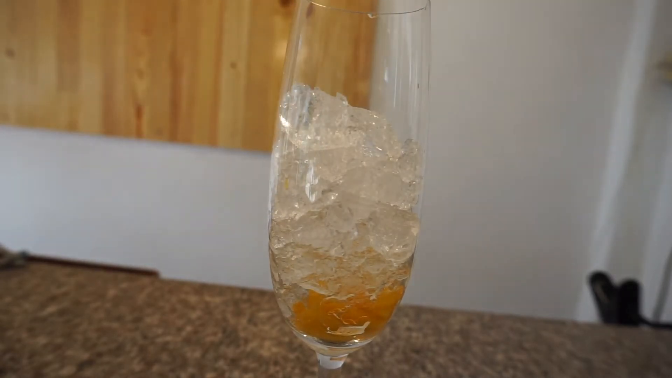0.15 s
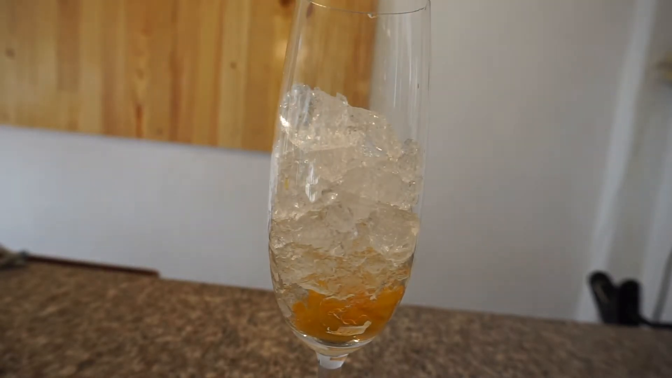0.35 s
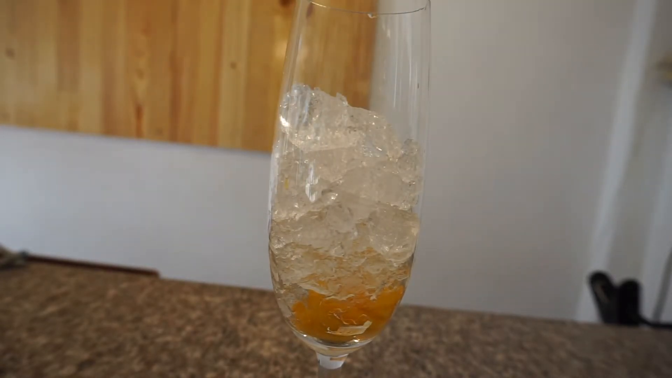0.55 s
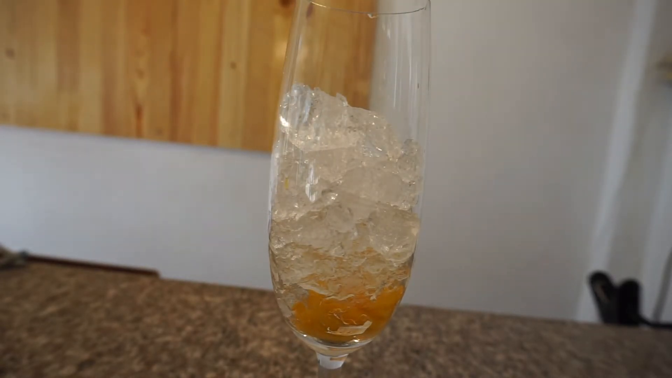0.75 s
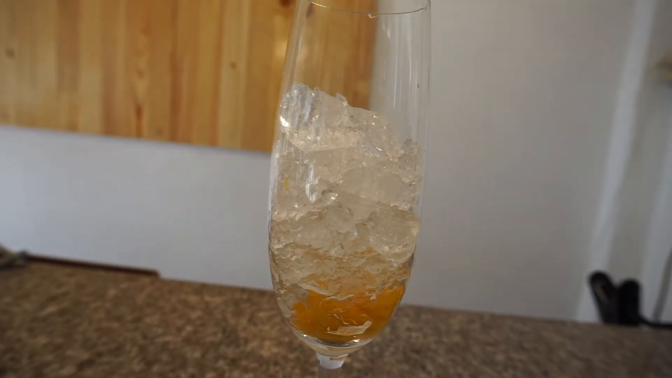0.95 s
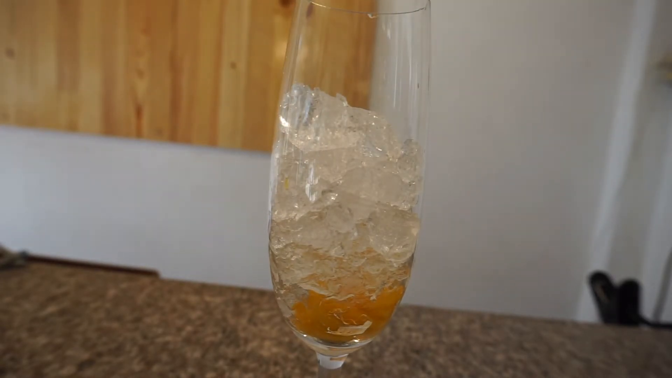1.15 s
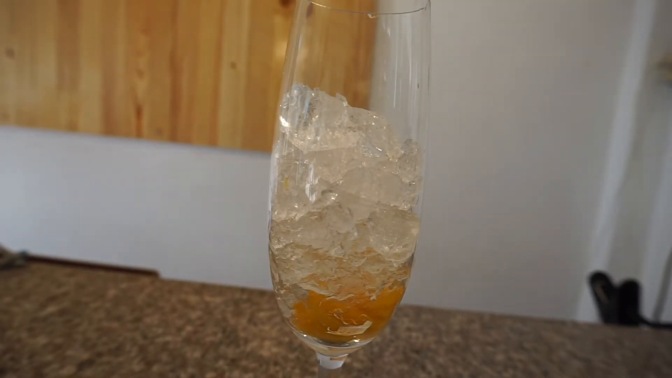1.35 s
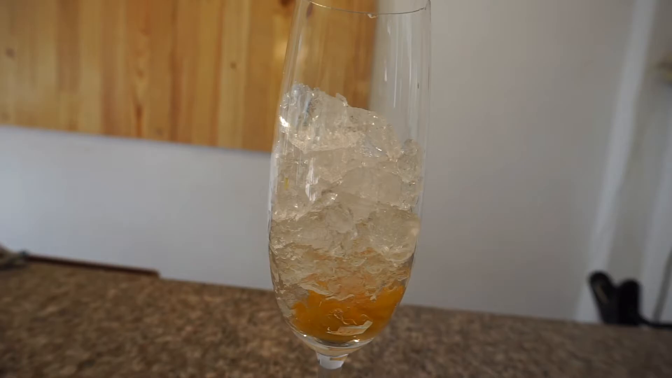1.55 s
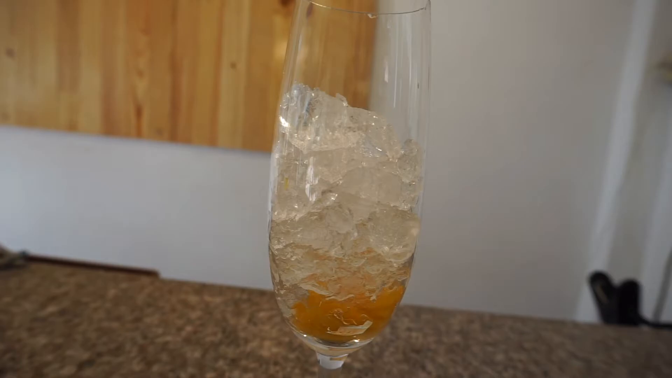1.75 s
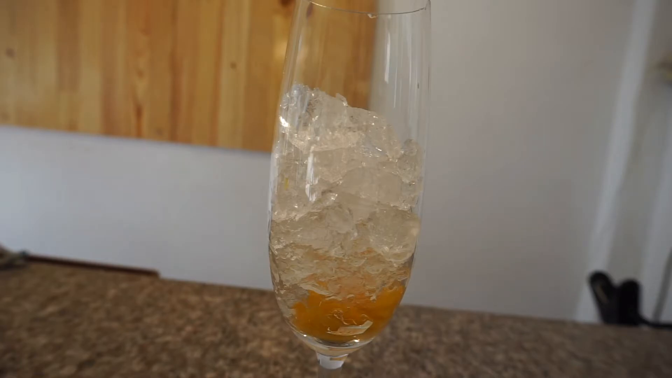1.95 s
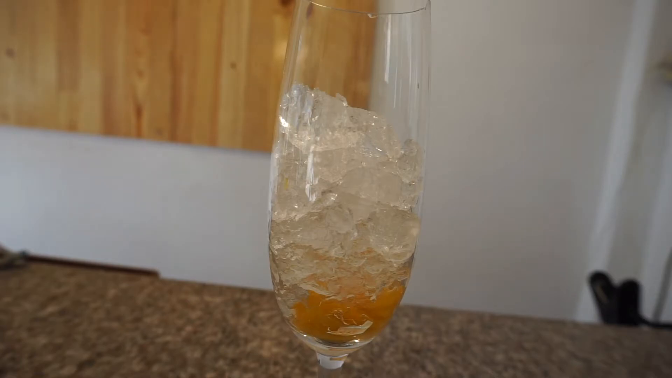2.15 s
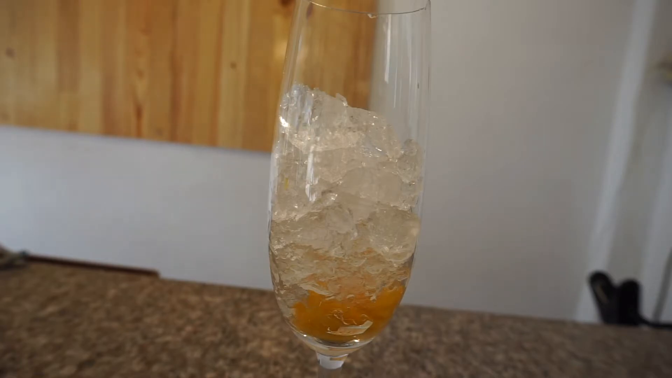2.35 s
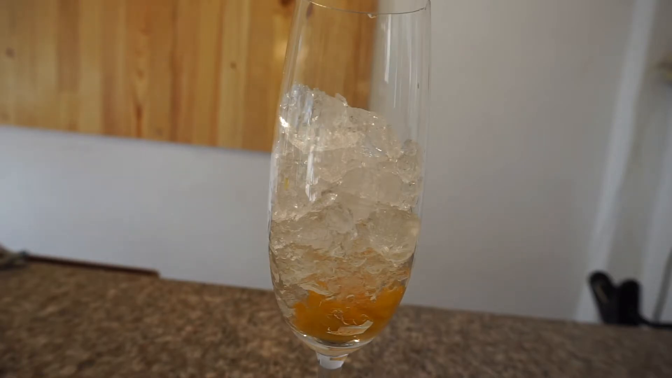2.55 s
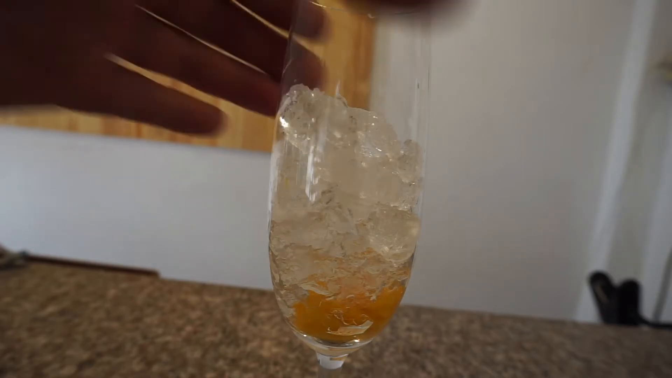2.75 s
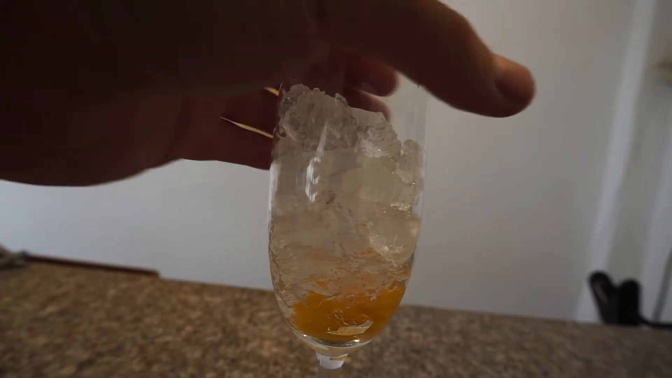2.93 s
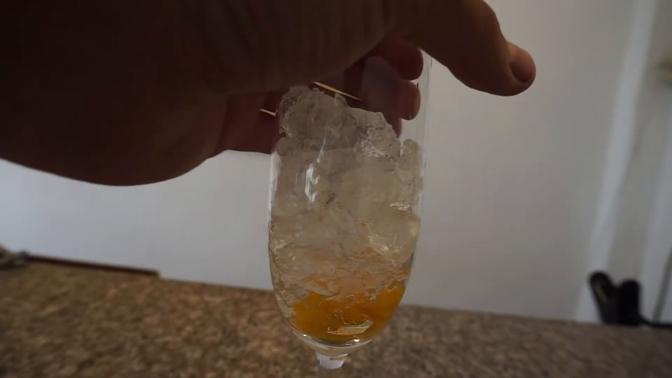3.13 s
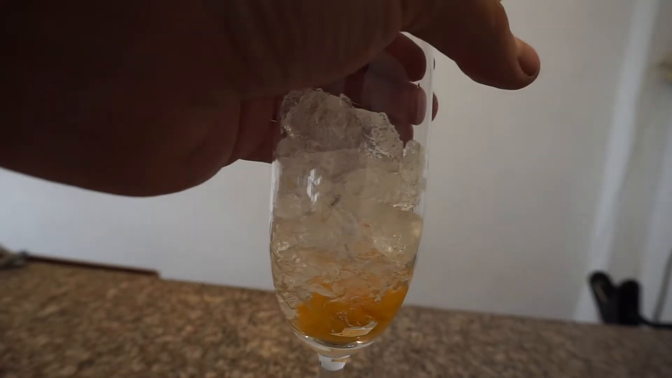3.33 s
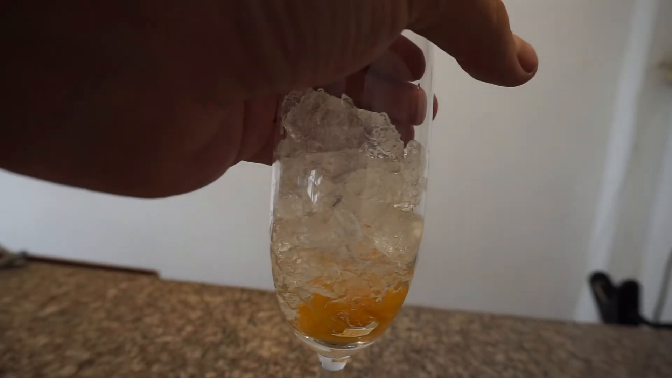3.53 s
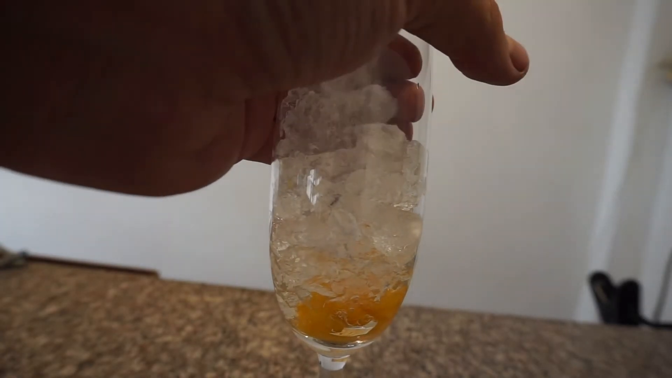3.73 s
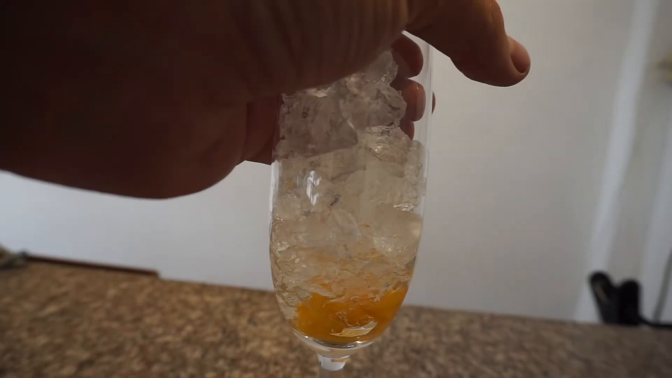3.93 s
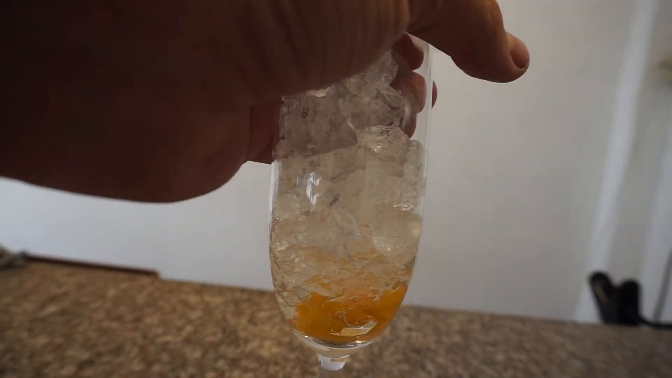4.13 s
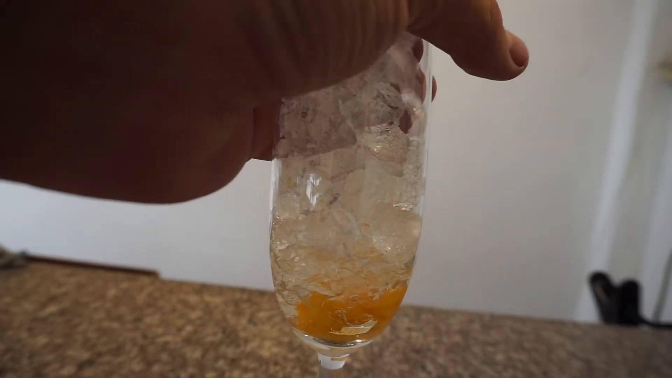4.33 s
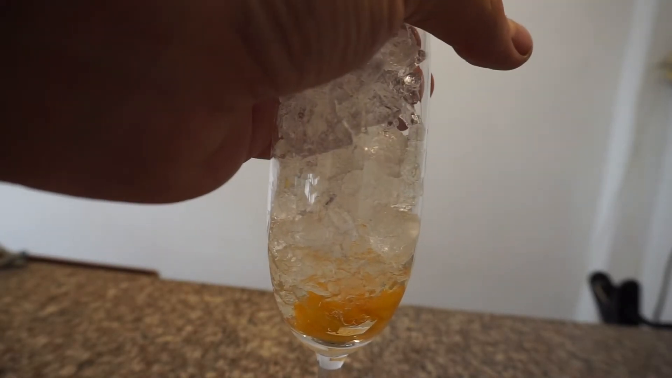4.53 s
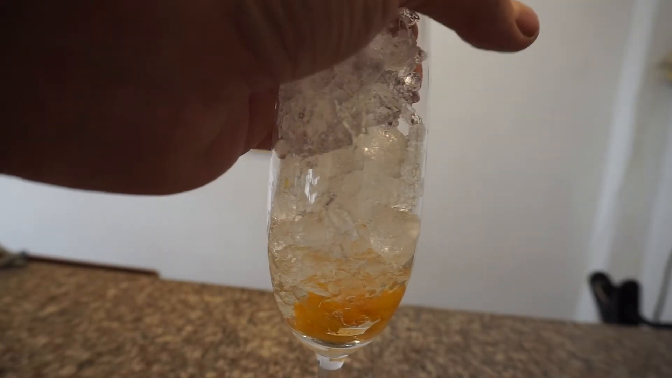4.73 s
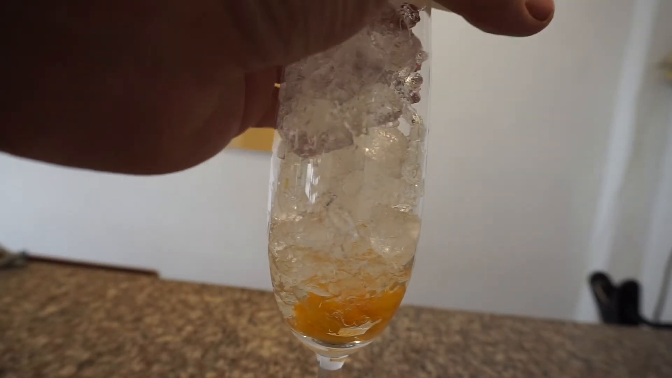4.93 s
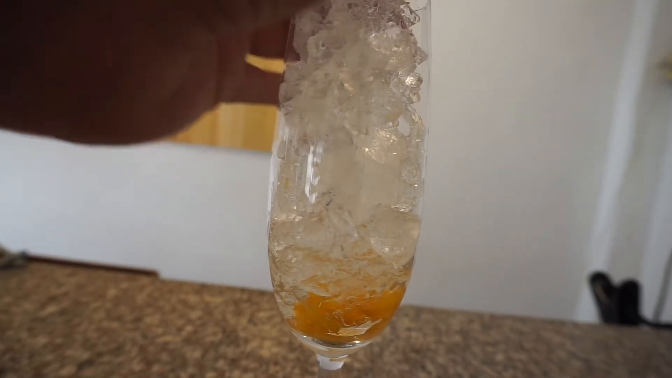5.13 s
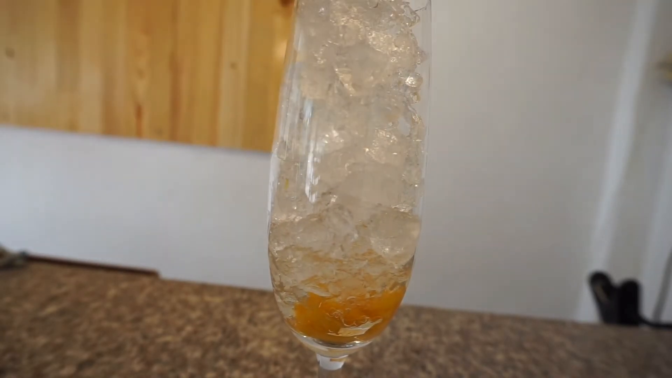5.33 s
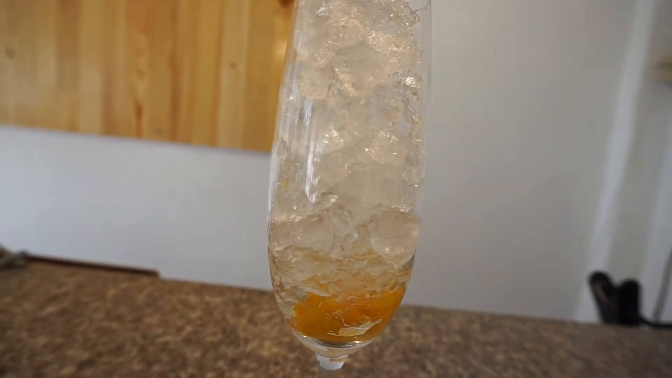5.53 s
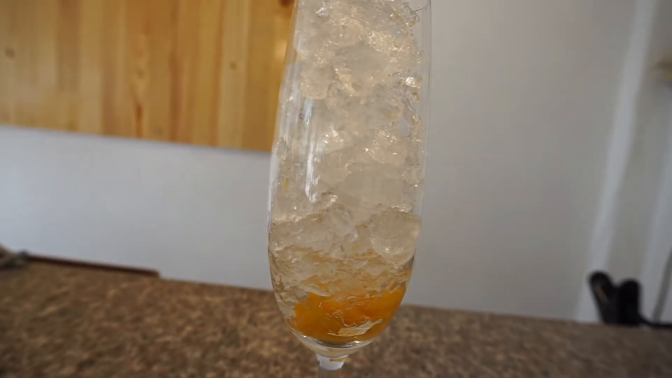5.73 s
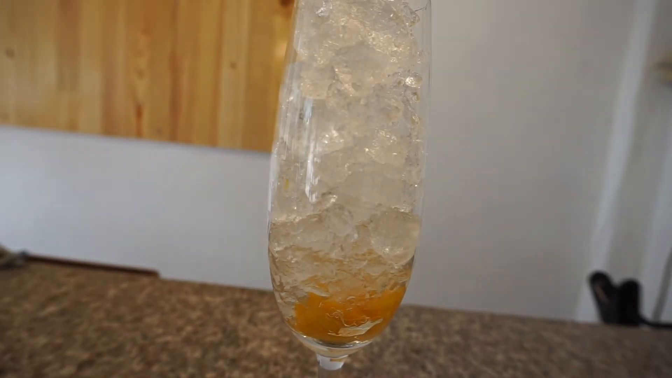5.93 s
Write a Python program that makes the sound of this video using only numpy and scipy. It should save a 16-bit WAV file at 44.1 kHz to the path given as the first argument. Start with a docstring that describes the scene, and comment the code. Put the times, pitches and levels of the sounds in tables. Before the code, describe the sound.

Crushed ice is scooped from a tub at the back of a kitchen, a dense, echoing rattle in several strokes. After a pause, close to the microphone, a palm thuds softly on the mouth of a tall glass and presses the ice in. Lumps knock and clink amid fine crunching, one shard pings, and a last lump clinks. A faint appliance hum runs underneath.

```python
"""Crushed ice pressed by hand into a tall glass, close by. Lumps knock on the ice-damped wall and ring
the air above the ice, amid fine crunching and soft palm thuds. One shard pings; a last lump clinks.
Before that, the ice is scooped from a tub at the back of the kitchen: a dense, reverberant rattle
of tiny contacts. An appliance hums throughout over soft air noise."""
import sys
import numpy as np
from scipy import signal
from scipy.fft import rfft, irfft, next_fast_len
from scipy.io import wavfile
from scipy.ndimage import uniform_filter1d

SR = 44100
rng = np.random.default_rng(int(sys.argv[2]) if len(sys.argv) > 2 else 0)


def wrap_up_sound(samples):
    """Save the sound to the file named by the first command line argument, as 16-bit audio."""
    columns = np.atleast_2d(samples).T
    # keep every value between -1 and 1, then stretch to whole-number steps
    tamed = np.clip(columns, -1, 1)
    steps = np.round(tamed * 32767).astype(np.int16)
    wavfile.write(sys.argv[1], SR, steps)


N = 263698
TIME_S = np.arange(N) / SR
CUTOFF_HZ = 11200

# Appliance hum. Each row: frequency in Hz, level in dB, width in Hz.
HUM_LINES = [(149.6, -71.5, 15), (188.8, -62.5, 16), (286.7, -73, 9.2), (331.6, -72, 12), (562, -72.5, 9.2),
             (623.4, -61.5, 11)]
# Air noise. Each row: frequency in Hz, spectral level in dB.
AIR_SPECTRUM = [(25, -11), (90, -16), (140, -8), (200, 4), (350, -1.5), (550, 7), (780, 4.5), (1050, -0.5),
                (1600, -7), (2300, -8.5), (3300, -15.5), (6000, -18), (11000, -18.5)]
# Drift of hum and air noise. Each row: time in seconds, gain in dB.
BACKGROUND_DRIFT = [(0, 0.5), (3.3, 2), (4.4, -2), (5.98, -0.1)]
# Kitchen decay. Each row: frequency in Hz, T60 in seconds.
ROOM_DECAY = [(200, 0.54), (800, 0.56), (2300, 0.98), (5000, 0.62), (10000, 0.45)]
# Diffuse field. Each row: frequency in Hz, left-right coherence from 0 to 1.
COHERENCE = [(30, .15), (70, .4), (150, .93), (650, 0.74), (1400, 0.37), (2600, 0.06), (5000, 0.027),
             (11000, .1)]
# Echoes off counter and walls. Each row: delay in seconds, gain in dB.
EARLY_ECHOES = [(.0013, -31.5), (.0057, -15), (0.0101, -15.5), (0.0189, -24)]
# Microphone phase. Each row: frequency in Hz, left minus right in radians.
MIC_PHASE = [(30, 0), (200, -0.35), (700, -0.79), (1500, -0.7), (2700, -0.48), (5000, -0.79), (9000, -1.4)]
# Microphone balance. Each row: frequency in Hz, left minus right in dB.
MIC_BALANCE = [(500, 0.5), (2200, 2.5), (4500, 2), (8000, 1), (11000, 0)]

# Contacts in the tub. Each row: frequency in Hz, spectral level in dB.
TUB_SPECTRUM = [(150, -30), (250, -20.5), (370, -25), (480, -11.5), (590, -5), (760, -8.5), (1080, -8.5),
                (1450, -4.5), (1800, -1.5), (2150, -2.5), (3200, -1.5), (4500, -11.5), (6500, -13.5),
                (11000, -14.5)]
# Tub resonances. Each row: frequency in Hz, gain in dB, T60 in seconds.
TUB_MODES = [(545, -7.5, .07), (599, 5.5, 0.11), (1482, 1, 0.0085), (2170, 3, 0.0061), (3230, -3.5, 0.0038)]
# Hand strokes in the tub. Each row: start in seconds, level in dB, swell and fade in seconds.
STROKES = [(.18, -24, 0.04, 0.12), (.36, -25.5, 0.059, 0.029), (.59, -21, 0.067, 0.12),
           (.8, -32, 0.029, 0.2), (1.1, -40, 0.11, 0.16), (1.3, -37, 0.038, 0.1), (1.44, -35, 0.053, 0.023)]
# Clumps break loose and bump the tub. Each row: start in seconds, crack in dB, bump in dB.
LOOSE_CLUMPS = [(0.188, -35, -44.5), (.271, -38, -21.5), (0.413, -35, -24.5), (0.655, -19.5, -27),
                (0.792, -25, -33), (0.937, -32, -23), (1.08, -35, -49), (1.249, -25, -33),
                (1.461, -35, -27), (1.486, -31.5, -37), (1.52, -27.5, -30)]
# Big lumps go first, chips remain. Each row: time in seconds, splinters over lumps in dB.
SPLINTER_MIX = [(.85, -4.5), (1.5, 0.5)]

# Palm sliding over the glass mouth. Each row: time in seconds, level in dB.
PALM_SLIDE = [(2.35, -67.5), (2.8, -70.5), (3.1, -58), (3.25, -62.5), (3.37, -46.5)]
# Palm closing on the glass mouth. Each row: time in seconds, level in dB.
PALM_THUDS = [(3.2545, -37), (3.2833, -30.5), (3.3774, -25.5), (3.3925, -29), (4.5645, -33)]
# Contacts in the palm. Each row: frequency in Hz, spectral level in dB.
PALM_SPECTRUM = [(200, -15.5), (480, -32.5), (690, 7), (900, -8.5), (1250, -4), (1850, 9.5), (2450, 11),
                 (3400, 0.5), (5000, -13), (8300, -6.5), (11000, -13)]
# Squeezes, weaker as the hand empties. Each row: start in seconds, level in dB, fade in seconds.
PALM_SQUEEZES = [(3.387, -30.5, 0.078), (3.53, -37, 0.25), (3.885, -35, 0.027), (4.045, -34, 0.066),
                 (4.17, -39.5, 0.075), (4.33, -43, 0.19), (4.664, -46.5, 0.067)]
# After-ring of the rim. Each row: frequency in Hz, gain in dB, T60 in seconds.
RIM_MODES = [(2356, -35, .25), (2460, -25, .55), (2606, -29, .42), (2740, -32, .33)]
# Loose shard. Each row: frequency in Hz, gain in dB, T60 in seconds.
SHARD_MODES = [(5430, -24.5, 0.042), (5670, -26.5, 0.029), (7780, -21.5, 0.064), (8060, -33, 0.041),
               (8080, -22, 0.1), (8400, -31.5, .06), (8700, -24.5, 0.14), (9400, -41, 0.092),
               (9262, -43, .03)]
# Air column under the cupped hand. Each row: frequency in Hz, gain in dB, unfilled T60 in seconds.
CAVITY_MODES = [(724, -13.5, 0.03), (781, 4, 0.047), (927, 4, 0.044), (1700, -1, .022), (2720, -7.5, 0.022),
                (3220, -9, 0.014)]
# Rising ice damps the air column. Each row: time in seconds, share of T60 left.
CAVITY_FILLING = [(3.4, 0.91), (3.7, 0.22), (4.3, 0.3)]
# Ice-damped glass wall. Each row: multiple of wall pitch, gain in dB, gripped T60 in seconds.
WALL_MODES = [(.77, -5.5, .006), (1.0, 6, .007), (1.12, -24.5, .005)]
# The loosening grip frees the wall. Each row: time in seconds, T60 multiplier.
GRIP_RELEASE = [(4.3, 1.0), (4.6, 1.8), (5.25, 2.0)]
# Lumps hitting the glass. Each row: time in seconds, level in dB,
# shatter from 0 (clean knock) to 1 (falls apart), wall pitch in Hz.
LUMP_KNOCKS = [(3.2833, -29.5, 0.23, 1730), (3.3753, -18, 0.38, 2400), (3.4437, -21.5, 0.53, 2200),
               (3.4909, -20, 0.76, 3150), (3.5404, -21.5, 0.6, 3230), (3.6076, -30, .15, 2200),
               (3.6583, -27.5, 0.62, 2600), (3.683, -23.5, .55, 3400), (3.7022, -31.5, 0.26, 3300),
               (3.7894, -24.5, 0.91, 1950), (3.804, -17, 0.27, 2490), (3.868, -29.5, 0.75, 2400),
               (3.8735, -17.5, 0.31, 2430), (3.9048, -19.5, 0.35, 2240), (3.9179, -26, 0.67, 2650),
               (3.9728, -18, 0.19, 2160), (3.9825, -26.5, 0.64, 2370), (4.048, -30, 0.76, 2470),
               (4.0797, -21, 0.096, 1740), (4.105, -15.5, 0.68, 2460), (4.1737, -23.5, 0.45, 2490),
               (4.261, -33, 1, 2600), (4.2731, -22.5, 0.51, 2380), (4.4239, -32, .15, 2600),
               (4.5654, -28.5, 0.78, 2620), (4.6229, -25, 0.032, 2500), (4.8314, -46, 0.34, 2620),
               (5.1695, -57, 1, 2450), (5.1935, -52.5, 0.93, 2290), (5.2518, -21.5, 0.13, 2470)]


def from_db(db):
    return 10 ** (np.asarray(db) / 20)


def unit_rms(x):
    return x / np.sqrt(np.mean(x ** 2) + 1e-20)


def at_hz(table, hz):
    """Table lookup, log-frequency axis."""
    table_hz, values = np.transpose(table)
    return np.interp(np.log(hz + 1e-9), np.log(table_hz), values)


def at_time(table, time_s):
    return np.interp(time_s, *np.transpose(table))


def bandpass(x, low_hz, high_hz):
    sos = signal.butter(2, [low_hz, min(high_hz, .45 * SR)], "band", fs=SR, output="sos")
    return signal.sosfilt(sos, x + 1e-18)


def log_bands(low_hz, count):
    """Low edge, centre and high edge in Hz of each band up to the cutoff."""
    edges = np.geomspace(low_hz, CUTOFF_HZ, count + 1)
    return zip(edges, np.sqrt(edges[:-1] * edges[1:]), edges[1:])


def ring(force, modes):
    """Force drives modes (Hz, dB, T60 s); a click yields decaying cosines."""
    out = 0
    for hz, db, t60_s in modes:
        radius, angle_rad = from_db(-60 / (t60_s * SR)), 2 * np.pi * hz / SR
        feedback = [1, -2 * radius * np.cos(angle_rad), radius * radius]
        out = out + from_db(db) * signal.lfilter([.5, 0, -.5], feedback, force + 1e-18)
    return out


def diffuse_noise(low_hz, centre_hz, high_hz, size):
    """Stereo noise band arriving from all around."""
    mid, side = bandpass(rng.standard_normal((2, size)), low_hz, high_hz)
    coherence = np.clip(at_hz(COHERENCE, centre_hz), 0, 1)
    return np.sqrt(1 + coherence) * mid + np.sqrt(1 - coherence) * side * [[1], [-1]]


def air_noise(level_db):
    """Soft diffuse noise of the kitchen."""
    air = sum(from_db(at_hz(AIR_SPECTRUM, hz)) * diffuse_noise(low_hz, hz, high_hz, N)
              for low_hz, hz, high_hz in log_bands(22.1, count=15))
    return from_db(level_db) * unit_rms(air)


def appliance_hum(waver):
    """Hum lines, each a sine wavering with narrowband noise."""
    hum = 0
    for hz, db, width_hz in HUM_LINES:
        noise = bandpass(rng.standard_normal(N + SR), hz - width_hz / 2, hz + width_hz / 2)[SR:]
        tone = np.sqrt(2) * np.sin(2 * np.pi * (hz * TIME_S + rng.random()))
        hum = hum + from_db(db) * unit_rms(tone + waver * unit_rms(noise))
    return hum


def room_response(early_db, late_db, early_t60_s):
    """Quick scatter off the counter, then a tail decaying band by band."""
    t, out = TIME_S[:SR * 2 // 3], 0
    for low_hz, hz, high_hz in log_bands(117, count=8):
        power = 0
        for db, t60_s, rise_s in ((early_db, early_t60_s, .003), (late_db, at_hz(ROOM_DECAY, hz), .012)):
            shape = ((1 - np.exp(-t / rise_s)) * np.exp(-np.log(1000) * t / t60_s)) ** 2
            power = power + from_db(db) ** 2 * shape / shape.sum()
        out = out + np.sqrt(power) * diffuse_noise(low_hz, hz, high_hz, len(t)) / np.sqrt(2)
    return out


def kitchen(x, direct_db, early_db, late_db, early_t60_s, left_db, paths=3):
    """Direct sound, echoes, and reverberation whose paths shift as hand and ice move."""
    out = x.copy()
    for delay_s, db in EARLY_ECHOES:
        lag = round(delay_s * SR)
        out[lag:] += from_db(db) * x[:N - lag]
    out = from_db(direct_db) * out
    shift_hz = 2 * np.arange(1, paths + 1)[:, None]
    shares = np.cos(2 * np.pi * (shift_hz * TIME_S + rng.random((paths, 1))))
    for share in shares / np.sqrt(np.sum(shares ** 2, axis=0) + 1e-3):
        response = room_response(early_db, late_db, early_t60_s)
        out = out + signal.oaconvolve((share * x)[None], response, axes=1)[:, :N]
    return out * from_db([[left_db / 2], [-left_db / 2]])


def cut_bass(x, low_hz):
    """Take the low bass out of the sound."""
    return signal.sosfilt(signal.butter(2, low_hz, "high", fs=SR, output="sos"), x + 1e-18)


def surges(pushes):
    """Joint gain of pushes that swell and fade, summed in power."""
    power = np.zeros(N)
    for start_s, db, swell_s, fade_s in pushes:
        at = round(start_s * SR)
        t = TIME_S[:N - at]
        swell = np.minimum(t / swell_s, 1) ** 2
        fade = np.exp(-np.maximum(t - swell_s, 0) / fade_s)
        power[at:] += (from_db(db) * swell * fade) ** 2
    return np.sqrt(power)


def ice_contacts(rate_hz, spread_db, spectrum, steady_s, modes=()):
    """Random clicks that also ring the vessel. Returns hollow, lump and splinter ranges at unit RMS."""
    at = np.flatnonzero(rng.random(N) < rate_hz / SR)
    sizes = np.zeros(N)
    sizes[at] = from_db(spread_db * np.minimum(rng.exponential(1, len(at)), 4))
    sizes /= np.sqrt(uniform_filter1d(sizes ** 2, int(steady_s * SR)) + 1e-4)  # even out mean power
    ranges, clicks = np.zeros((3, N)), np.zeros(N)
    splits_hz = [1200, 3800]
    for low_hz, hz, high_hz in log_bands(151.6, count=20):
        clicks[at] = sizes[at] * rng.standard_normal(len(at))
        gain = from_db(at_hz(spectrum, hz))
        ranges[np.searchsorted(splits_hz, hz)] += gain * bandpass(clicks, low_hz, high_hz)
    for hz, db, t60_s in modes:
        clicks[at] = sizes[at] * rng.standard_normal(len(at))
        resonance_gain = t60_s * SR / np.log(1e6)
        ranges[np.searchsorted(splits_hz, hz)] += ring(clicks, [(hz, db, t60_s)]) / resonance_gain
    return np.array([unit_rms(part) for part in ranges])


def scooping(hollow_db, clump_attack_s, crack_fade_s, bump_fade_s):
    """Dense contacts in the tub swell with each stroke and surge when a clump gives way."""
    push = surges(STROKES)
    cracks = surges((start_s, db, clump_attack_s, crack_fade_s) for start_s, db, _ in LOOSE_CLUMPS)
    bumps = surges((start_s, db, clump_attack_s, bump_fade_s) for start_s, _, db in LOOSE_CLUMPS)
    hollow, lumps, splinters = ice_contacts(
        rate_hz=1900, spread_db=6.0, spectrum=TUB_SPECTRUM, steady_s=0.02, modes=TUB_MODES)
    ice = lumps + from_db(at_time(SPLINTER_MIX, TIME_S)) * splinters
    return np.hypot(push, cracks) * ice + np.hypot(from_db(hollow_db) * push, bumps) * hollow


def palm_slide():
    """Soft palm friction, coloured by the enclosed air."""
    touching = (TIME_S > PALM_SLIDE[0][0]) & (TIME_S < PALM_SLIDE[-1][0])
    friction = bandpass(ring(rng.standard_normal(N), CAVITY_MODES), 550, 890)
    return from_db(at_time(PALM_SLIDE, TIME_S)) * touching * unit_rms(friction)


def blow(x, db):
    """Scale an impact to the energy of 5 ms at this level."""
    return from_db(db) * x / np.sqrt(np.sum(x ** 2) / (.005 * SR) + 1e-20)


def palm_thuds(top_hz):
    """The soft palm rings only the lowest air modes of the glass."""
    out = np.zeros(N)
    thud = bandpass(ring(signal.unit_impulse(SR // 8), CAVITY_MODES), 677, top_hz)
    for time_s, db in PALM_THUDS:
        at = round(time_s * SR)
        out[at:at + len(thud)] += blow(thud, db)
    return out


def crunching(attack_s, hollow_db):
    """Sparser, sharper contacts as the handful is squeezed into the glass."""
    push = surges((start_s, db, attack_s, fade_s) for start_s, db, fade_s in PALM_SQUEEZES)
    hollow, lumps, splinters = ice_contacts(
        rate_hz=820, spread_db=3.5, spectrum=PALM_SPECTRUM, steady_s=0.06)
    return push * (from_db(hollow_db) * hollow + lumps + splinters)


def shatter_loss_db(shatter):
    """A lump that falls apart drives the glass less."""
    return 7.5 * shatter ** 2


def rim_ring(gain_db, held_db, release_s):
    """The rim rings on after each knock, quieter while the hand is on it."""
    taps = np.zeros(N)
    for time_s, db, shatter, _ in LUMP_KNOCKS:
        tap_db = db - shatter_loss_db(shatter) + gain_db + held_db * (time_s < release_s)
        taps[round(time_s * SR)] = from_db(tap_db)
    return ring(taps, RIM_MODES)


def shard_ping(time_s):
    """One click rings a loose shard."""
    return ring(signal.unit_impulse(N, round(time_s * SR)), SHARD_MODES)


def fractures(t, crush_s, crumble_s):
    """Tiny cracks build up to the landing at t = 0, then die away."""
    swell = np.exp(np.minimum(t / crush_s, -t / crumble_s))
    return swell * rng.standard_normal(len(t)) * (rng.random(len(t)) < .35)


def landings(rebound_s=0.0072, rebound_db=-13):
    """Each lump lands twice, the second time weaker."""
    rebounds = [(time_s + rebound_s * rng.uniform(.8, 1.2), db + rebound_db, shatter, wall_hz)
                for time_s, db, shatter, wall_hz in LUMP_KNOCKS]
    return list(LUMP_KNOCKS) + rebounds


def knocks(crumble_gain, crush_s, splinter_s, cavity_db, wall_db, chip_db):
    """Each lump crushes its edge, clicks and crumbles, driving the wall and the air above the ice."""
    out, lead = np.zeros(N), SR // 100
    t = np.arange(-lead, SR // 8) / SR
    unfilled_db, shatter_cavity_db, shatter_chip_db = 19, 10, 14
    for time_s, level_db, shatter, wall_hz in landings():
        crumble_s = np.interp(shatter, [0, 1], [0.00054, 0.0025])
        force = crumble_gain * (1 + 2 * shatter) * fractures(t, crush_s, crumble_s) + (t == 0)
        air_left, release = at_time(CAVITY_FILLING, time_s), at_time(GRIP_RELEASE, time_s)
        wall_modes = [(wall_hz * ratio, db, t60_s * release) for ratio, db, t60_s in WALL_MODES]
        cavity_modes = [(hz, db, t60_s * air_left) for hz, db, t60_s in CAVITY_MODES]
        wall = bandpass(ring(force, wall_modes), 0.58 * wall_hz, 1.29 * wall_hz)
        cavity = bandpass(ring(force, cavity_modes), 550, 4000)
        # Splinters fly a moment longer; shattering brightens them.
        splinters = fractures(t - splinter_s, crush_s + splinter_s, crumble_s + splinter_s)
        chips = bandpass(splinters, 3080, 8000 + 4000 * shatter)
        knock = blow(wall, wall_db - shatter_loss_db(shatter))
        knock += blow(cavity, cavity_db + unfilled_db * air_left + shatter_cavity_db * shatter)
        knock += blow(chips, chip_db + shatter_chip_db * np.sqrt(shatter))
        at = round(time_s * SR) - lead
        out[at:at + len(t)] += from_db(level_db) * knock[:N - at]
    return out


def scene():
    """Tub far and slightly left, glass close, hum and air behind."""
    rattle = scooping(hollow_db=-7.5, clump_attack_s=0.0019, crack_fade_s=0.019, bump_fade_s=0.0094)
    rattle = cut_bass(rattle, low_hz=172)
    tub = kitchen(rattle, direct_db=-7.0, early_db=-1.5, late_db=-2.5, early_t60_s=0.066, left_db=1.5)
    ice = knocks(crumble_gain=.1, crush_s=.0007, splinter_s=.001,
                 cavity_db=-28.5, wall_db=-1, chip_db=-12.5)
    ice += cut_bass(crunching(attack_s=0.033, hollow_db=-7.5), low_hz=200)
    ice += palm_slide() + palm_thuds(top_hz=1007)
    ice += rim_ring(gain_db=7, held_db=-13, release_s=4.2737) + shard_ping(time_s=4.2737)
    glass = kitchen(ice, direct_db=-1.5, early_db=-7, late_db=-6.5, early_t60_s=0.086, left_db=-0.86)
    background = air_noise(level_db=-58) + appliance_hum(waver=0.66)
    return tub + glass + background * from_db(at_time(BACKGROUND_DRIFT, TIME_S))


def record(dry):
    """Phase and level offsets between the two microphones, then a steep low-pass."""
    size = next_fast_len(N + SR // 4)
    hz = np.arange(size // 2 + 1) * SR / size
    sides = np.array([[.5], [-.5]])
    response = np.exp(1j * at_hz(MIC_PHASE, hz) * sides) * from_db(at_hz(MIC_BALANCE, hz) * sides)
    heard = irfft(rfft(dry, size) * response, size)[:, :N]
    return signal.sosfilt(signal.ellip(10, .2, 80, CUTOFF_HZ - 100, fs=SR, output="sos"), heard)


dry = scene()
out = record(dry)
wrap_up_sound(out)
```